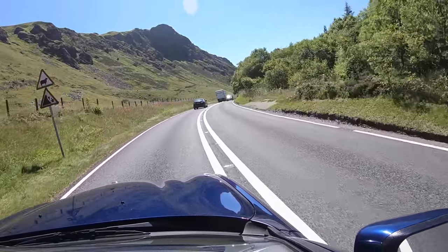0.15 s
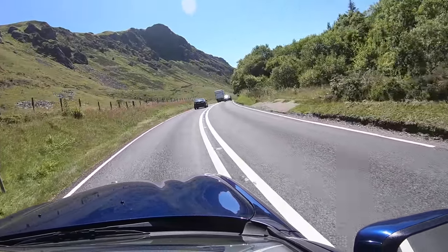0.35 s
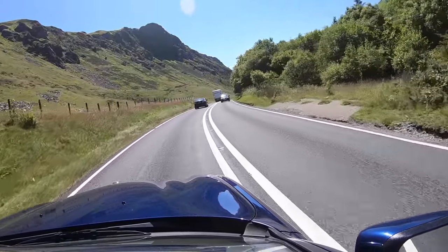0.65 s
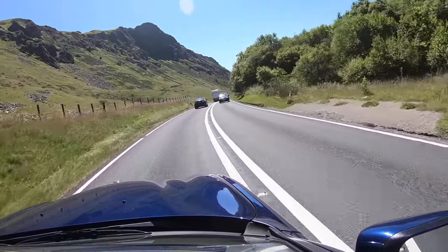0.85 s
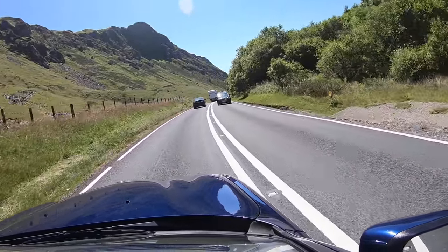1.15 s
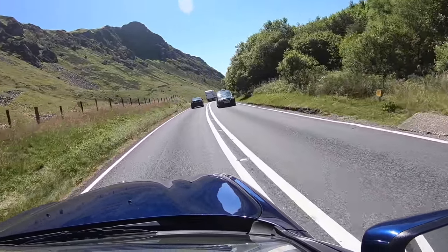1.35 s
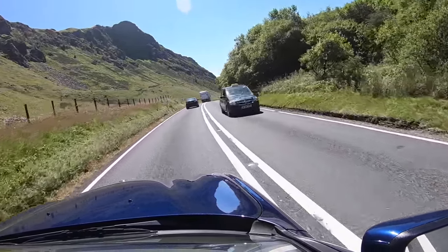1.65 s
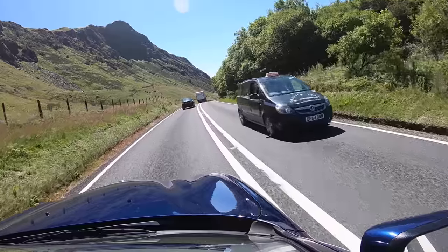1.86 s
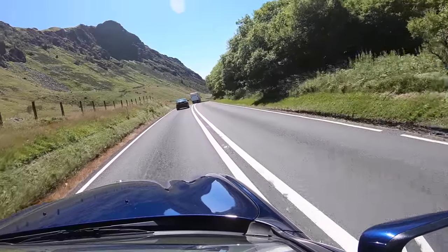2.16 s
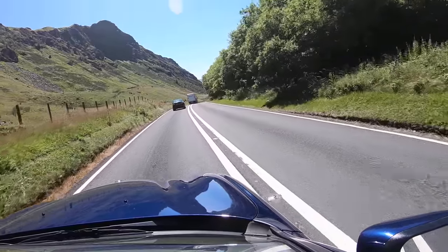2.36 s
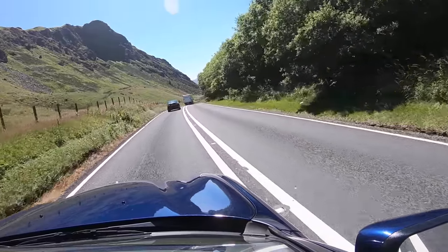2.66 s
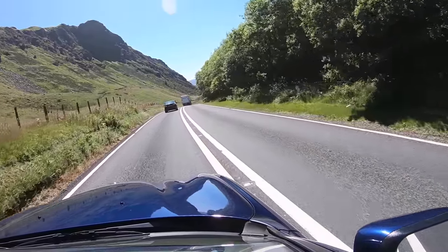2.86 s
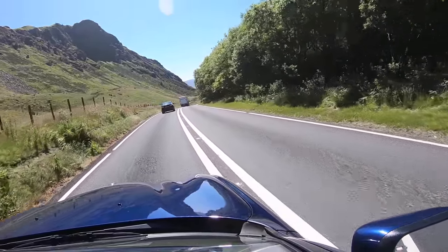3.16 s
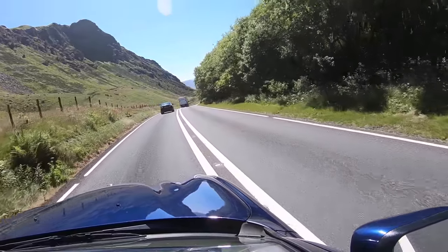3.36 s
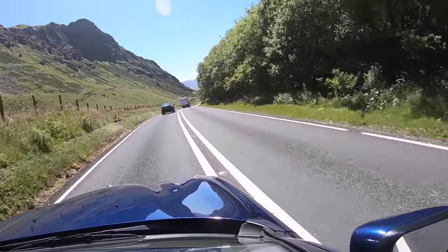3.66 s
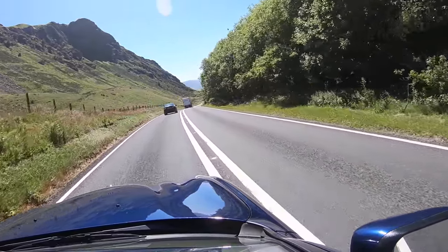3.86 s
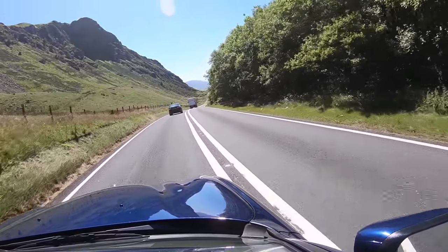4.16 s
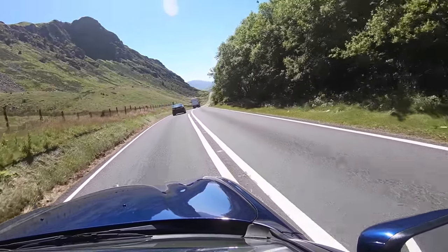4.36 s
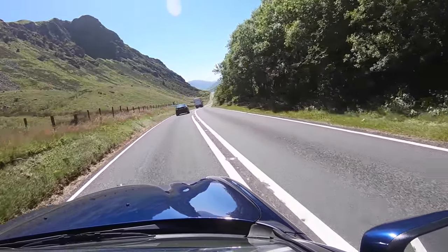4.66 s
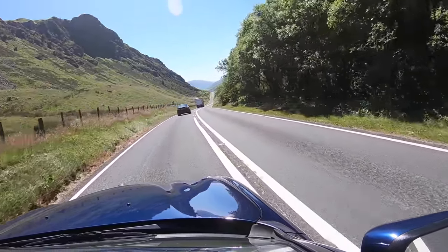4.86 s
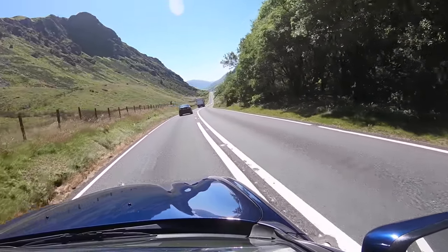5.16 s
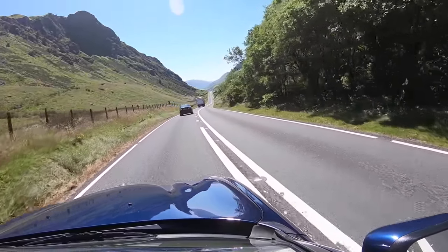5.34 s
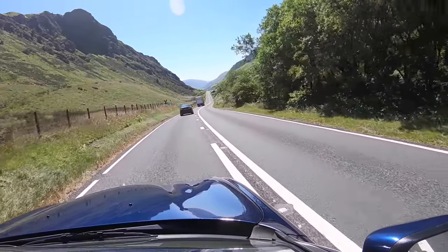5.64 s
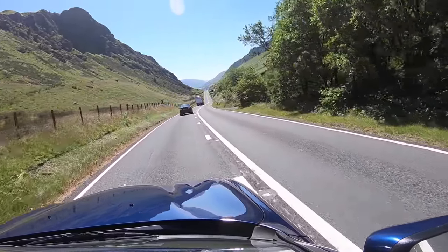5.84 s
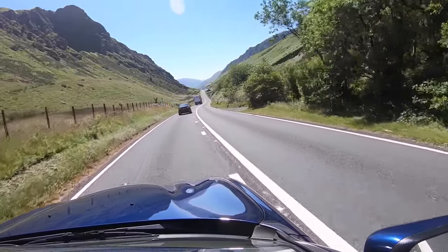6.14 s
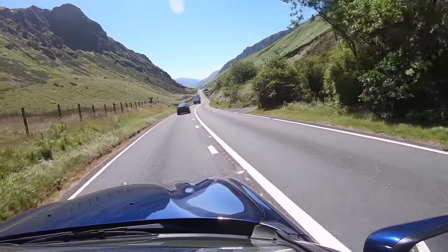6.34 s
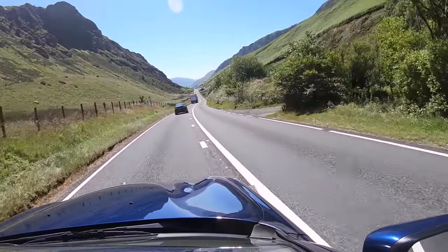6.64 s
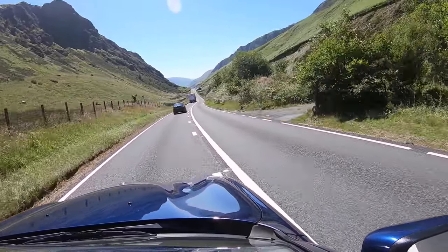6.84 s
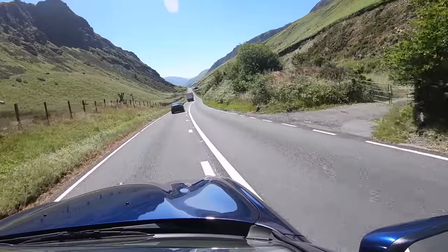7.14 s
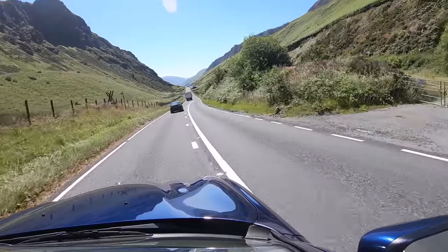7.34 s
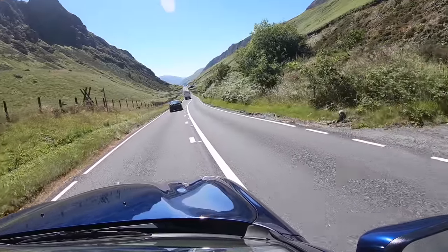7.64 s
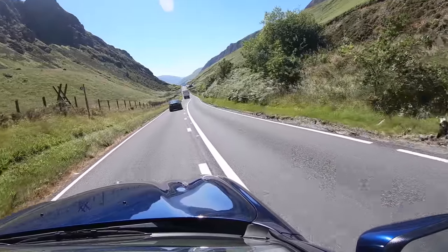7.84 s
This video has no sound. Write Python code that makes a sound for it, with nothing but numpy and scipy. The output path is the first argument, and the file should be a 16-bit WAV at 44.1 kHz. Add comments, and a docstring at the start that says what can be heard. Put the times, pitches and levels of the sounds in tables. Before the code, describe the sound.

Wind rumbles and pops against the microphone outside a car until an approaching jet's howl swells into a loud, crackling roar.

```python
"""One microphone in a camera housing, riding outside a car through a valley.
From the start, wind buffets the housing in gusts and single eddies pop right on the port.
At about 5.5 s the intakes of a distant jet fighter begin to howl through the wind.
From 7 s it tears overhead with exhaust roar, crackling shocks and fan whine, combed by
an echo off the car's bodywork whose delay shifts as the jet crosses the sky."""
import sys
import numpy as np
from scipy import signal
from scipy.fft import rfft, irfft
from scipy.io import wavfile
from scipy.ndimage import map_coordinates

SR = 44100
rng = np.random.default_rng(int(sys.argv[2]) if len(sys.argv) > 2 else 0)


def unload_audio(sound):
    """Save the sound as a 16-bit wav file, at the path given as the first command line argument."""
    columns = np.transpose(np.atleast_2d(sound))
    # keep every value between -1 and 1, then stretch to whole-number steps
    steps = np.round(np.clip(columns, -1, 1) * 32767)
    wavfile.write(sys.argv[1], SR, steps.astype(np.int16))


N = 352800
T = np.arange(N) / SR


def gain_of(db):
    """Decibels to amplitude."""
    return 10 ** (np.asarray(db) / 20)


def unit_rms(x):
    """Scales each row to rms 1."""
    return x / np.sqrt(np.mean(x ** 2, -1, keepdims=True) + 1e-20)


def curves(rows):
    """Interpolates each column after the first (t/s) to one value a sample."""
    times, *columns = np.transpose(rows)
    return np.array([np.interp(T, times, column) for column in columns])


def noise_bands(colour, seams_hz):
    """Coloured noise split into overlapping bands, each of rms 1."""
    hz = np.fft.rfftfreq(N, 1 / SR) + 1
    knots_hz, db = np.transpose(colour)
    spectrum = rfft(rng.standard_normal(N)) * gain_of(np.interp(np.log(hz), np.log(knots_hz), db))
    below = [0] + [1 / (1 + (hz / seam) ** 8) for seam in seams_hz] + [1]
    bands = [irfft(spectrum * np.sqrt(abs(b - a)), N) for a, b in zip(below, below[1:])]
    return unit_rms(np.array(bands))


def flicker(low_hz, top_hz):
    """Random wobble of rms 1 between two rates."""
    hz = np.fft.rfftfreq(N, 1 / SR) + 0.11
    passband = 1 / (1 + (hz / top_hz) ** 2) / (1 + (low_hz / hz) ** 2)
    return unit_rms(irfft(rfft(rng.standard_normal(N)) * passband, N))


def wind():
    """Turbulence on the housing: lumpy rumble, four gusting bands and hiss, fluttering as eddies hit."""
    # wind colour within the bands: f/Hz, density/dB
    colour = [(10, -29), (22, 0), (32, -2.5), (45, 5), (100, -3), (200, -11.5), (547, -22), (800, -28.5),
              (1720, -35), (2880, -48), (4340, -49.5), (5550, -59.5), (8350, -61.5), (10100, -78),
              (11500, -105), (13100, -122), (22000, -130)]
    # seams between rumble, roar, rasp, rush, fizz and hiss: f/Hz
    seams_hz = [140, 620, 1300, 2600, 5500]
    # gusts: t/s, fizz/dB, rasp/dB, roar/dB
    gusts = [(0.0, -59, -44, -28), (0.03, -56, -45.5, -22), (0.13, -64, -51, -34), (0.15, -59, -44, -24),
             (0.22, -52, -47, -26), (0.26, -52, -39, -19), (0.31, -56, -43, -25), (0.33, -50, -48, -24),
             (0.39, -54.5, -44, -24), (0.57, -49, -38, -19.5), (0.59, -49, -42, -23),
             (0.65, -45.5, -34.5, -20), (0.72, -53, -37, -24), (0.91, -51, -44, -20.5),
             (0.96, -57, -52, -26.5), (1.05, -56, -46, -25.5), (1.14, -59, -47, -30), (1.22, -61, -43, -29),
             (1.35, -60, -49.5, -30.5), (1.48, -58, -42.5, -30.5), (1.52, -53, -49, -22),
             (1.59, -57, -40, -32), (1.68, -53, -41, -22), (1.7, -47, -39, -19.5), (1.74, -54, -36, -30.5),
             (1.91, -51, -34, -28), (2.09, -54.5, -43.5, -25), (2.13, -54, -40.5, -28),
             (2.37, -56, -45, -30), (2.46, -52.5, -37.5, -27), (2.61, -52.5, -44.5, -26),
             (2.65, -53, -39.5, -27), (2.78, -59, -42, -24), (2.83, -54, -35, -24), (2.89, -50, -41, -24),
             (2.98, -49.5, -32.5, -20), (3.04, -55, -36.5, -28), (3.31, -54, -48, -23),
             (3.33, -53, -45, -30), (3.41, -56.5, -34, -24.5), (3.48, -51.5, -38, -23.5),
             (3.58, -52.5, -39.5, -28.5), (3.65, -57, -42.5, -32), (3.8, -60, -43.5, -29.5),
             (3.92, -58.5, -43, -31.5), (4.03, -60, -43, -30.5), (4.13, -59, -49, -32),
             (4.15, -61, -39, -31), (4.33, -56, -41, -25.5), (4.37, -62, -31, -27), (4.44, -58, -40, -24),
             (4.52, -61, -37.5, -30), (4.56, -59, -38.5, -26.5), (4.65, -56, -34.5, -19),
             (4.7, -57.5, -41, -25), (4.98, -56.5, -39.5, -23.5), (5.02, -56, -42, -24),
             (5.06, -58, -39.5, -26), (5.3, -54.5, -42.5, -25), (5.35, -52.5, -37, -27.5),
             (5.5, -53.5, -33.5, -21.5), (5.67, -60.5, -34, -30.5), (5.72, -56.5, -30, -26.5),
             (5.85, -59, -34.5, -29), (5.95, -55, -31, -24), (6.3, -59, -37.5, -24.5),
             (6.61, -56, -29, -23), (6.65, -56, -36.5, -28)]
    # roar, rasp, rush, fizz, a row each: level in a mean gust/dB,
    # shares of the fizz, rasp and roar swings, joint flutter/dB, own flutter/dB
    eddies = [(-25.5, 0.046, 0.028, 0.65, 1, 1.5), (-43.5, .01, 1, .01, 0.8, 2),
              (-47.5, 0.17, 0.41, .01, 1.44, 1.5), (-55, .99, .05, .01, 0.9, 0.5)]
    # lowest band: t/s, level/dB
    rumble_levels = [(0.0, -23.5), (0.09, -33), (0.18, -17.5), (0.22, -22.5), (0.73, -16.5), (1.33, -24),
                     (1.85, -17), (2.63, -24), (2.94, -13.5), (3.27, -27.5), (3.32, -20), (3.54, -14.5),
                     (4.05, -27.5), (4.39, -17.5), (4.5, -23), (4.61, -13), (4.75, -25.5), (4.79, -16),
                     (5.3, -26), (5.55, -16), (5.68, -26.5), (5.72, -15), (6.19, -25), (6.48, -19),
                     (7.98, -25.5), (8.0, -21)]
    # highest band: t/s, level/dB
    hiss_levels = [(0.0, -66), (0.02, -74), (0.13, -74), (0.2, -65), (0.5, -65), (0.51, -58), (0.59, -65),
                   (0.62, -59), (0.72, -61), (0.77, -68), (0.84, -63), (0.99, -72), (1.34, -75),
                   (1.43, -69), (1.49, -74), (1.52, -64), (1.6, -68), (1.71, -61), (1.76, -67), (1.89, -64),
                   (2.08, -70), (2.65, -66), (2.81, -75.5), (2.83, -65), (2.96, -61.5), (3.03, -68),
                   (3.4, -68.5), (3.53, -63), (3.64, -73), (4.06, -73), (4.1, -79), (4.15, -71),
                   (4.36, -64.5), (4.56, -69), (4.65, -63), (4.72, -71), (5.04, -65), (5.07, -71),
                   (5.53, -62), (5.6, -71), (5.88, -67.5), (6.03, -62.5), (6.27, -72), (6.6, -71)]
    mean_gust_db, settled_s = (-55, -43, -28), 7.0
    rumble, *middle, hiss = noise_bands(colour, seams_hz)
    gust_levels = curves(list(gusts) + [(settled_s, *mean_gust_db)])
    fizz_db, rasp_db, roar_db = gust_levels - np.array(mean_gust_db)[:, None]
    level_db, of_fizz, of_rasp, of_roar, joint_db, own_db = np.transpose(eddies)[:, :, None]
    swing_db = of_fizz * fizz_db + of_rasp * rasp_db + of_roar * roar_db
    joint_flutter = flicker(0.93, 40)
    own_flutter = np.array([flicker(2, 76) for _ in middle])
    middle = unit_rms(middle * gain_of(joint_db * joint_flutter + own_db * own_flutter))
    middle *= gain_of(level_db + swing_db)
    hiss = unit_rms(hiss * gain_of(1.5 * joint_flutter - 0.1 * flicker(2, 70)))
    hiss *= gain_of(curves(hiss_levels)[0])
    rumble = unit_rms(rumble * gain_of(1.8 * flicker(4.4, 28)))
    rumble *= gain_of(curves(rumble_levels)[0])
    return rumble + middle.sum(0) + hiss


def pops():
    """Eddies slap the microphone port: a suction, a damped wiggle and an air puff, dulled by the port."""
    # slaps: t/s, wiggle and puff level/dB, wiggle f/Hz, suction level/dB
    slaps = [(0.148, -31, 1210, -30), (0.167, -28, 960, -30), (0.331, -25, 865, -6.5),
             (0.508, -27, 1100, -16), (0.559, -18.5, 830, -15), (0.641, -25.5, 1080, -29),
             (0.674, -27, 1400, -30), (0.686, -23, 890, -29), (0.737, -27, 890, -28),
             (0.805, -23, 1200, -16), (0.841, -24, 829, -13), (0.895, -19, 890, -3.5),
             (0.927, -27, 824, -15), (1.012, -35, 1220, -27), (1.059, -27, 720, -30),
             (1.576, -40, 1040, -26), (2.16, -24, 1060, -25), (2.837, -28, 1140, -31),
             (2.859, -20, 1000, -11), (2.895, -21, 870, -18), (2.912, -26, 553, -27), (2.943, -20, 880, -8),
             (2.971, -19, 890, -20), (2.984, -32, 1200, -25), (2.999, -26, 760, -26),
             (3.376, -25, 751, -34), (3.512, -23, 905, -22), (4.229, -37, 895, -27), (4.574, -25, 816, -28),
             (5.009, -18.5, 920, -20), (5.368, -24, 1100, -3.5), (5.649, -35, 816, -30),
             (5.872, -25, 750, -31), (6.208, -25.5, 750, -20), (6.298, -30, 790, -29)]
    rise_s, suction_hz, length = 0.002, 150, 900
    out, t = np.zeros(N + length), np.arange(length) / SR
    puffs = signal.lfilter([0.3], [1, -0.78], rng.standard_normal((len(slaps), length)))
    envelope = (t / rise_s * np.exp(1 - t / rise_s)) ** 2
    for (start, db, hz, suction_db), puff in zip(slaps, puffs):
        slap = gain_of(db) * (0.6 * np.sin(2 * np.pi * hz * t) + 2 * puff)
        suction = -gain_of(suction_db) * np.cos(2 * np.pi * suction_hz * (t - rise_s))
        out[round(start * SR):][:length] += (slap + suction) * envelope
    return signal.sosfilt(signal.butter(5, 1750, fs=SR, output="sos"), out[:N])


def resonate(x, hz, width_hz):
    """Moving resonance: shifts hz to zero, smooths twice and shifts back."""
    carrier = np.exp(2j * np.pi * np.cumsum(hz) / SR)
    pole = np.exp(-np.pi * width_hz / SR)
    smooth = x / carrier
    for _ in range(2):
        smooth = signal.lfilter([1 - pole], [1, -pole], smooth)
    return 2 * (carrier * smooth).real


def duct(tracks, tone_shares):
    """A duct sings: a wavering tone inside its own ringing noise, throbbing where the two mix."""
    out, waver, roughness = np.zeros(N), flicker(20.2, 64), flicker(8, 50)
    for track, share in zip(tracks, tone_shares):
        start, end = round(track[0][0] * SR), round(track[-1][0] * SR)
        hz, db, width_hz = curves(track)[:, start:end]
        offset = rng.integers(N - end + start)
        own = slice(offset, offset + end - start)  # each voice wobbles in its own way
        tone = np.sqrt(2) * np.sin(2 * np.pi * np.cumsum(hz + 0.5 * width_hz * waver[own]) / SR)
        ringing = unit_rms(resonate(rng.standard_normal(end - start), hz, width_hz.mean()))
        throb = gain_of(12 * share * (1 - share) ** 2 * roughness[own])
        out[start:end] += unit_rms((share * tone + (1 - share) * ringing) * throb) * gain_of(db)
    return out


def intake_howl():
    """The intakes howl, first from far off: each note swells and sinks as its pitch glides in an S."""
    # howls: start t/s, peak t/s, end t/s, from f/Hz, to f/Hz, peak level/dB, width/Hz, tone share
    howls = [(5.45, 5.74, 5.9, 440, 500, -23, 100, .3), (5.64, 5.83, 6.0, 605, 675, -21, 110, .3),
             (6.24, 6.62, 7.0, 580, 685, -23.5, 46, .65), (6.8, 7.15, 7.35, 690, 710, -22, 70, .5),
             (7.0, 7.26, 7.56, 620, 570, -15, 150, .55), (7.42, 7.55, 7.62, 760, 860, -21.5, 100, .5),
             (7.55, 7.78, 7.92, 330, 385, -19, 60, .7), (7.82, 7.95, 8.0, 335, 345, -17, 60, .7),
             (7.5, 7.8, 8.0, 225, 195, -20, 70, .5), (7.72, 7.93, 8.0, 560, 535, -24, 60, .6)]
    tracks = []
    for start, peak, end, from_hz, to_hz, peak_db, width_hz, _ in howls:
        t = np.linspace(start, end, 40)
        hz = from_hz + (to_hz - from_hz) * np.sin(np.pi / 2 * (t - start) / (end - start)) ** 2
        off_peak = np.where(t < peak, (peak - t) / (peak - start), (t - peak) / (end - peak))
        tracks.append(np.transpose([t, hz, peak_db - 24 * off_peak ** 3, np.full_like(t, width_hz)]))
    return duct(tracks, tone_shares=[howl[-1] for howl in howls])


def approach():
    """Gains of the exhaust bands: each murmurs from afar, climbs steeply until it arrives, then drifts."""
    # six bands, low to high: arrival t/s, level/dB, rise/(dB/s), later drift/(dB/s),
    # surge share, distant level/dB, change in the lull/dB
    arrivals = [(7.598, -19, 8.5, 7, 0.4, -33, 3), (7.05, -34.5, 58, -8, 0.22, -42, -8),
                (7.079, -27.5, 42, 6, 1, -44, 6), (7.1, -38.5, 53, 1, 0.96, -67, -38),
                (7.501, -34.5, 56, 4.5, 0.56, -72, -9), (7.551, -47, 32.5, -6, 0.46, -85.5, 7)]
    # surges and dips of the exhaust: t/s, change/dB, half length/s
    surges = [(6.776, 9.5, 0.068), (6.914, 9.5, 0.068), (7.068, 9.5, 0.08), (7.103, -4, 0.013),
              (7.121, 6.5, 0.028), (7.184, 9.5, 0.026), (7.24, 5.5, 0.028), (7.29, 3.5, 0.026),
              (7.346, 8.5, 0.024), (7.42, -2.5, 0.017), (7.577, -2, 0.023), (7.587, 2, 0.012),
              (7.643, 0.5, 0.022), (7.88, -7, 0.01)]
    arrival, level_db, rise, drift, share, far_db, lull_db = np.transpose(arrivals)[:, :, None]
    surge_db = sum(db * np.exp(-((T - centre) / half) ** 2) for centre, db, half in surges)
    lull_s = 7.41  # three bands drop briefly while the others lift
    lull = np.exp(-((T - lull_s) / np.where(T < lull_s, 0.048, 0.15)) ** 2)
    slope = np.where(T < arrival, rise, drift)
    near_db = level_db + slope * (T - arrival) + share * surge_db + lull_db * lull
    far_db = far_db + 2.5 * np.minimum(T - 7.9, 0)
    return np.hypot(gain_of(near_db), gain_of(far_db))


def exhaust_roar(bands):
    """The exhaust mixes with the air; the higher the band, the harder it flickers."""
    flicker_db = np.array([0.3, 0.5, 0.7, 0.8, 1.1, 1.5])[:, None] * flicker(12, 120)
    return (unit_rms(bands * gain_of(flicker_db)) * approach()).sum(0)


def fan_whine():
    """The fan at close range: two gliding bands of ringing noise."""
    # one track a band: t/s, centre f/Hz, level/dB, width/Hz
    whines = [
        [(7.3, 4500, -37, 1000), (7.36, 4500, -32, 1000), (7.45, 4420, -33.5, 1000), (7.6, 4440, -26, 800),
         (7.7, 4370, -27.5, 700), (7.8, 4180, -27, 600), (8.0, 4070, -33.5, 600)],
        [(6.8, 6580, -62, 900), (6.92, 6460, -59, 900), (7.07, 6430, -53, 900), (7.2, 6360, -46, 900),
         (7.3, 6750, -52, 900), (7.36, 6430, -37, 900), (7.5, 6000, -31, 900), (7.58, 5400, -32, 900),
         (7.68, 5700, -35, 900), (7.8, 5800, -32.5, 900), (7.9, 6500, -36, 900), (8.0, 6650, -46, 900)],
    ]
    return duct(whines, tone_shares=[0, 0])


def crackle(bands):
    """Shocks in the exhaust reach the microphone as bright bursts that die in milliseconds."""
    # shock bursts: t/s, level/dB, decay/s
    cracks = [(6.9313, -40, 0.0053), (7.0676, -27, 0.0055), (7.1345, -20, 0.0039), (7.1735, -37, 0.0073),
              (7.2234, -25, 0.012), (7.2544, -28, 0.01), (7.3, -26, 0.0062), (7.3104, -24, 0.012),
              (7.327, -20, 0.017), (7.441, -23, 0.0048), (7.5274, -19, 0.007), (7.574, -13, 0.008),
              (7.627, -14, 0.008), (7.683, -18, 0.006), (7.8494, -18, 0.005), (7.9594, -22, 0.0044)]
    out, attack_s = np.zeros(N), 0.001
    bright = 0.06 * bands[2] + 0.06 * bands[3] + 0.22 * bands[4] + 0.05 * bands[5]
    for start, db, decay_s in cracks:
        span = slice(round(start * SR), round((start + 0.1) * SR))
        age = T[span] - start
        envelope = (1 - np.exp(-age / attack_s)) * np.exp(-age / decay_s)
        out[span] += gain_of(db) * bright[span] * envelope
    return out


def bodywork_echo(direct):
    """The bounce off a panel beside the microphone; its delay shifts as the jet crosses the sky."""
    # echo path: t/s, delay/ms, strength (0-1)
    path = [(7.33, 0.5, 0), (7.38, 0.53, 0.8), (7.47, 0.64, 0.9), (7.6, 0.77, 0.9), (7.72, 0.86, 0.85),
            (7.82, 0.88, 0.7), (7.9, 0.82, 0.6), (8.0, 0.72, 0.55)]
    delay_ms, strength = curves(path)
    delay_ms *= 1 + 0.012 * flicker(5, 40)  # turbulent air shakes the path
    hz = np.fft.rfftfreq(N + SR, 1 / SR)
    # the grazing bounce turns the phase, and the curved panel scatters the treble away
    panel = np.exp(1.9j) / (1 + (hz / 3500) ** 8)
    bounced = irfft(rfft(direct, N + SR) * panel, N + SR)
    return strength * map_coordinates(bounced, [np.arange(N) - delay_ms * SR / 1000], order=3)


def jet():
    """The pass overhead: roar, whine and crackle, combed by their own short echo."""
    # exhaust colour within the bands: f/Hz, density/dB
    colour = [(35, -20), (60, 4), (164, 0.5), (264, -2), (327, -4.5), (441, -4), (558, 1.5), (914, -6.5),
              (1350, -15.5), (2970, -29.5), (4280, -30), (6800, -34.5), (7300, -41), (8800, -45.5),
              (10100, -58.5), (11300, -80), (15000, -87), (22000, -94)]
    # seams between the six bands: f/Hz
    seams_hz = [450, 1100, 2400, 3900, 7000]
    bands = noise_bands(colour, seams_hz)
    direct = exhaust_roar(bands) + fan_whine() + crackle(bands)
    return direct + bodywork_echo(direct)


def scene():
    """Wind at the housing and the jet above, all at one microphone."""
    howl = intake_howl()
    return (wind() + pops() + howl + jet())[None]


def record(dry):
    """Loud peaks round off, the treble above 10 kHz is dulled, and the band ends at 15.7 kHz."""
    rounded = 0.83 * np.tanh(dry / 1.036)
    treble_shelf = signal.firwin2(255, [0, 10000, 11200, SR / 2], gain_of([0, 0, -9, -9]), fs=SR)
    band_limit = signal.firwin(511, 15700, window=("kaiser", 9), fs=SR)
    dulled = signal.oaconvolve(rounded, treble_shelf[None], "same")
    return signal.oaconvolve(dulled, band_limit[None], "same")


dry = scene()
out = record(dry)
unload_audio(out)
```